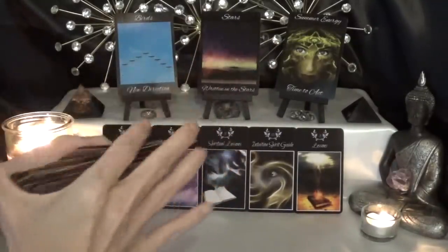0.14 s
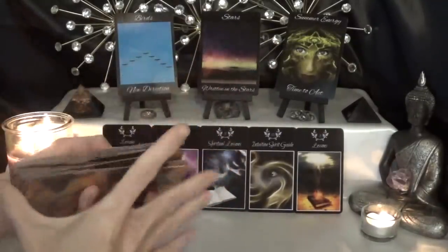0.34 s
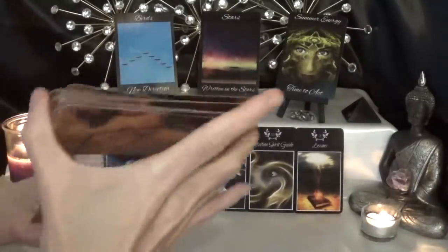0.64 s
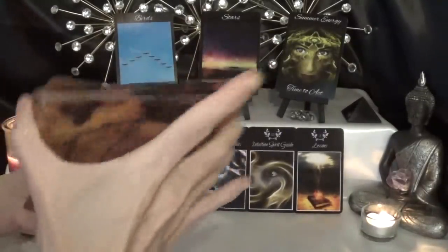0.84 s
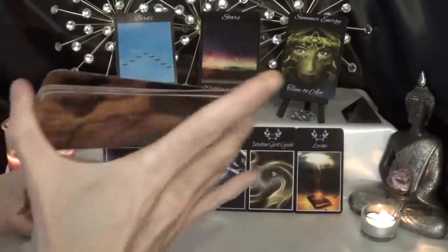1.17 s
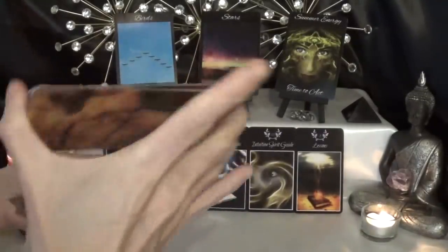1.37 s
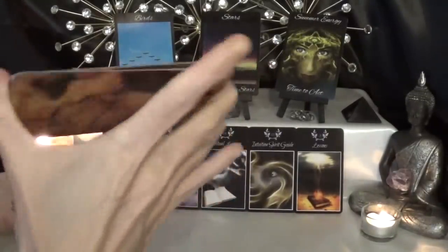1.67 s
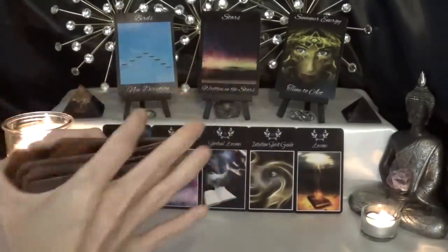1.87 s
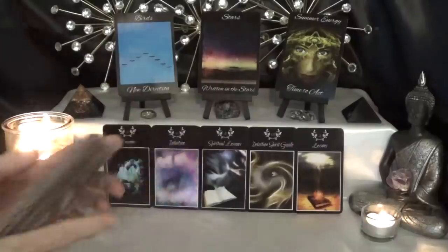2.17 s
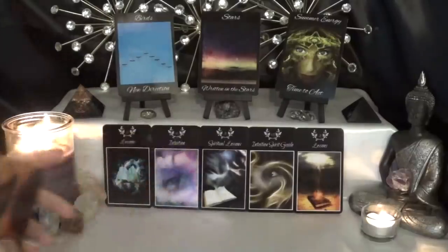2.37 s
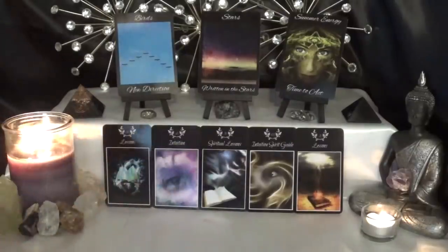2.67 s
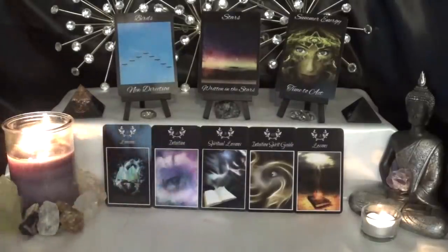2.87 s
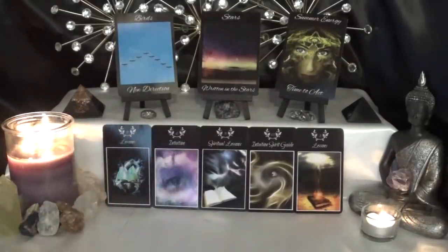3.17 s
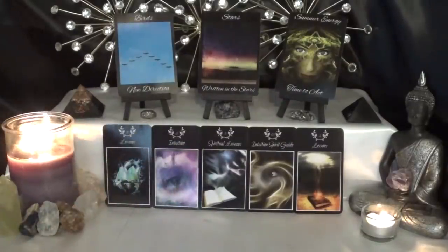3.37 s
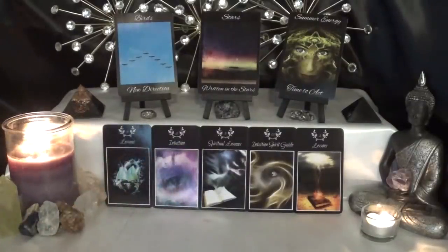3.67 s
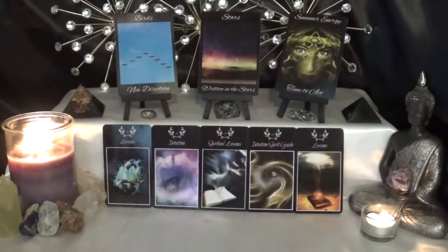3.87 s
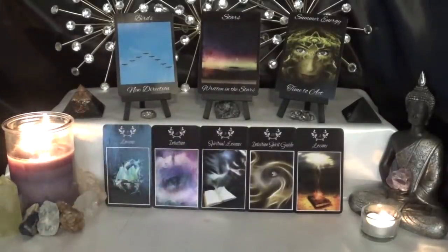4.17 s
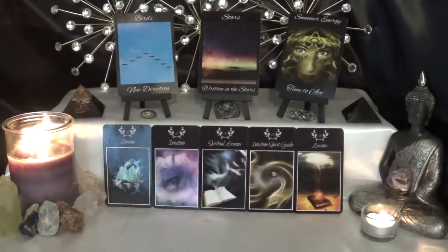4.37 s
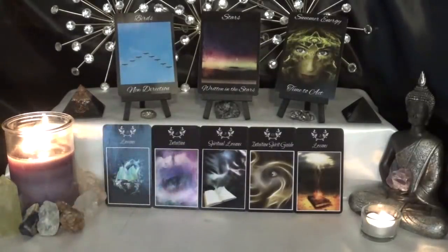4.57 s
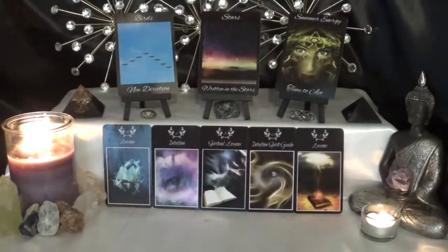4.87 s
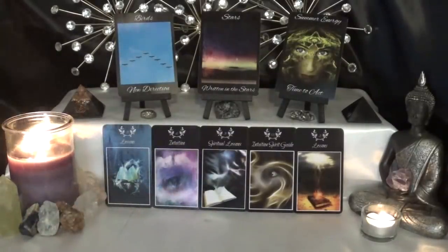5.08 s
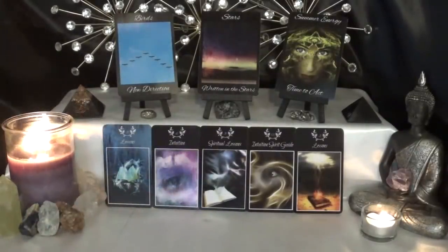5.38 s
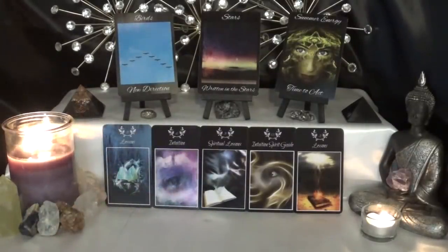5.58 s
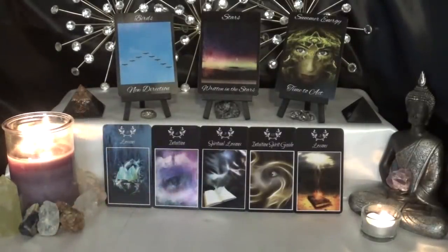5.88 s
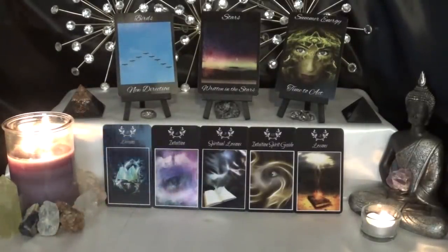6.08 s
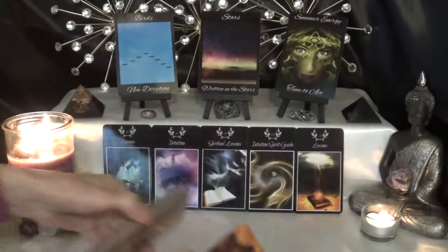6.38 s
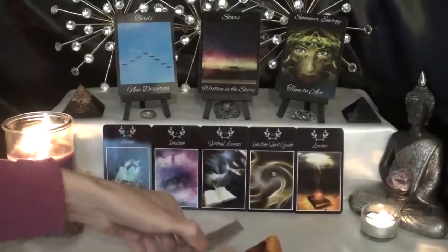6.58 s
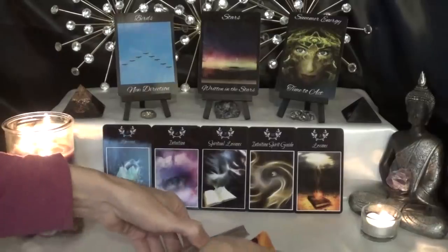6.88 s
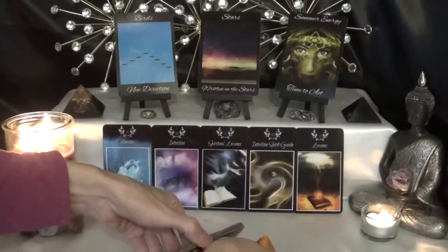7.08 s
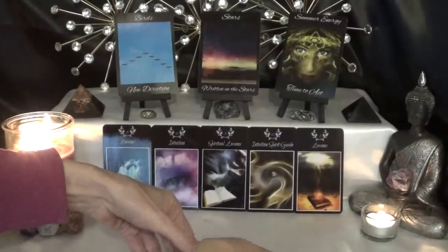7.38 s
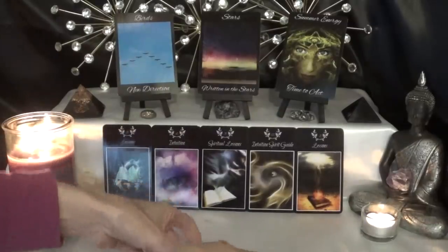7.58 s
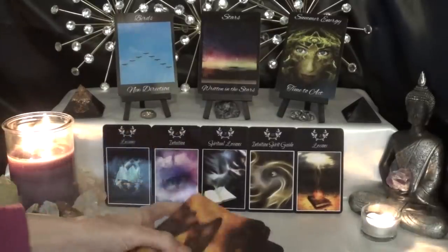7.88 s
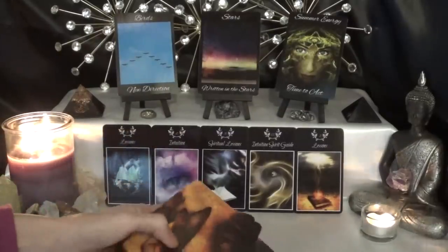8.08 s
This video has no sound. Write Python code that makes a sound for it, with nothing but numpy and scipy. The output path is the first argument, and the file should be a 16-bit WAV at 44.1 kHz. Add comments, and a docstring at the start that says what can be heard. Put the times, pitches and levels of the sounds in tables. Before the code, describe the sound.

A deck of cards is handled close to a stereo microphone pair in a small furnished room with a short, soft tail. From 0 to 2 s, six overhand strokes land at uneven intervals of roughly a quarter second or more, each a crisp crack with trailing ticks, a papery slide and a stop. Around 2.1-2.5 s the deck is squared with patchy rustling and a tap. At 2.9 s it thuds dully on the table. Until 5 s there are only faint brushes, tiny ticks and a very weak knock near 4 s. From 5.1 to 5.65 s come harder, woody raps, strongest at the start and end. Small taps follow from 6.2 s; at 6.9-7.5 s about ten cards snap and slap down rapidly. A tiny squeak, rustle and light clicks finish by 8.2 s. Quiet air and low hum continue throughout, with a faint pulsing high whine until 3.25 s and again from 6.2 s.

```python
"""A small furnished room, a cloth-covered table: a deck of cards is shuffled overhand close to a microphone pair.
Packets slide as patchy friction noise, and card edges snap as cracks with fast rebounds.
The deck is knocked on the table, heard as a swept thud over ringing modes; cards are then thumbed off,
flicked down and picked up. Behind them lie noise-like room air, a quiet hum of sines and a faint pulsing whine."""
import sys
import numpy as np
from scipy import signal
from scipy.fft import rfft, irfft, next_fast_len
from scipy.io import wavfile
from scipy.ndimage import uniform_filter1d, map_coordinates

SR = 44100
rng = np.random.default_rng(int(sys.argv[2]) if len(sys.argv) > 2 else 0)


def file_out(sig):
    """Save sig as 16-bit WAV at sys.argv[1]."""
    # one column per channel
    cols = np.atleast_2d(sig).T
    # limit, then scale
    lim = np.clip(cols, -1, 1)
    pcm = np.round(lim * 32767).astype(np.int16)
    wavfile.write(sys.argv[1], SR, pcm)


N = 363384
TOP_HZ = 11250  # band limit of the microphone pair
TIME = np.arange(N) / SR
HIT_SIZE = 16384  # samples in one hit or room tail
HIT_TIME = np.arange(HIT_SIZE) / SR
HIT_HZ = np.fft.rfftfreq(HIT_SIZE, 1 / SR)


def amp(db):
    """Decibels to gain."""
    return 10 ** (np.asarray(db) / 20)


def unit(x):
    """Scale to rms 1."""
    return x / np.sqrt(np.mean(x ** 2) + 1e-20)


def along(points, hz):
    """Read (frequency [Hz], value) points on a log frequency axis."""
    f, v = np.transpose(points)
    return np.interp(np.log(hz + 1), np.log(f + 1), v)


def fade(t, t60):
    """Exponential decay, 60 dB down after t60 seconds."""
    return np.exp(-np.log(1000) * t / t60)


def below(hz, corner_hz, order):
    """A smooth step from 1 under the corner to 0 above it."""
    return 1 / (1 + (hz / corner_hz) ** order)


def wobble(rate):
    """A smooth random curve, rate knots a second."""
    knots = rng.standard_normal(int(N * rate / SR) + 4)
    return map_coordinates(knots, [TIME * rate])


def filtered(x, response):
    """Multiply the spectrum of x by a response of frequency."""
    m = next_fast_len(N + SR // 2)
    return irfft(rfft(x, m) * response(np.fft.rfftfreq(m, 1 / SR)), m)[..., :N]


def struck(x, gain):
    """Colour one hit with minimum phase, so that nothing sounds before the contact."""
    # folding the cepstrum forward in time makes the filter causal
    cepstrum = irfft(np.log(np.maximum(gain, 1e-6)))
    cepstrum[1:HIT_SIZE // 2] *= 2
    cepstrum[HIT_SIZE // 2 + 1:] = 0
    coloured = irfft(rfft(x) * np.exp(rfft(cepstrum)))
    return coloured * below(HIT_TIME, .28, order=40)


def dying_noise(decay):
    """Two unrelated noises in which each frequency dies at its own speed."""
    hz, t, z = signal.stft(rng.standard_normal((2, HIT_SIZE)), SR, nperseg=256)
    dying = z * fade(t, along(decay, hz)[:, None])
    return signal.istft(dying, SR, nperseg=256)[1][:, :HIT_SIZE]


def spread(pair, side_db):
    """Left and right from a middle signal and a weaker side signal."""
    side = amp(side_db) * pair[1]
    return np.array([pair[0] + side, pair[0] - side])


def add(track, s, sound):
    """Mix a sound into the track at time s [s]."""
    part = track[:, max(round(s * SR), 0):][:, :sound.shape[-1]]
    part += sound[..., :part.shape[-1]]


# colour of the room air: (frequency [Hz], relative level [dB])
AIR_COLOUR = [(13, -51.5), (22, -5.5), (55, -14), (92, -7.5), (119, -11), (159, -13.5), (201, -25.5),
              (223, -10), (241, -14.5), (281, -20), (525, -22), (1210, -26.5), (1340, -27.5), (2190, -29),
              (11000, -37), (14300, -64), (22000, -120)]
# likeness of left and right in the air reaching the pair: (frequency [Hz], correlation [0-1])
AIR_LIKENESS = [(100, 0.54), (250, 0.8), (600, 0.077), (3000, 0.2), (10000, 0.37)]
# steady appliance hum: (frequency [Hz], level [dB rms])
HUM_TONES = [(91.5, -70), (120, -70.5), (149, -71.5), (240, -61.5)]
# when the thin whine sounds: (start [s], end [s])
WHINE_SPANS = [(0, 3.25), (6.217, 8.24)]


def background():
    """Room air as filtered noise, a slightly unsteady hum of sines, and a thin whine that pulses."""
    def mid_and_side(hz):
        turn = np.arccos(np.clip(along(AIR_LIKENESS, hz), -1, 1)) / 2
        return amp(along(AIR_COLOUR, hz)) * [np.cos(turn), np.sin(turn)]

    mid, side = filtered(rng.standard_normal((2, N)), mid_and_side)
    air = amp(-57.5) * unit(np.array([mid + side, mid - side]))
    hum = np.zeros(N)
    for hz, db in HUM_TONES:
        level = amp(db + 0.55 * wobble(9.7))
        hum += level * unit(np.sin(2 * np.pi * hz * TIME + 0.2 * wobble(22.0)))
    pulses = np.maximum(np.sin(2 * np.pi * 29 * TIME + .5 * wobble(7.1)), 0) ** 2
    tone = np.sin(2 * np.pi * 4000 * TIME + 2.1 * wobble(60))
    sounding = sum((TIME > start) & (TIME < end) for start, end in WHINE_SPANS)
    whine = amp(-72) * sounding * unit(pulses * tone)
    return air + hum + whine


# how fast the room's tail dies: (frequency [Hz], time to fall 60 dB [s])
ROOM_T60 = [(150, 0.42), (1000, 0.4), (4000, 0.2), (10000, 0.23)]


def room(x):
    """A small furnished room answers every third of a second of sound with a noise tail of its own."""
    out = np.zeros((2, N))
    for start in range(0, N, SR // 3):
        tail = spread(dying_noise(ROOM_T60), side_db=-5.5) * (1 - fade(HIT_TIME, 0.0033))
        tail /= np.linalg.norm(tail[0])
        answer = signal.fftconvolve(x[None, start:start + SR // 3], tail, axes=1)
        add(out, start / SR, answer)
    return out


# the deck meeting the table, corner first and then the whole edge: (corner time [s], corner level [dB],
# rocking time [s], edge level [dB], hardness [Hz], bass weight [dB], damping by the hand [dB/s])
DECK_KNOCKS = [(2.874, -29, .023, -26, 1050, 10, 340), (2.907, -20, 0.011, -26.5, 560, 10.5, 337),
               (4.01, -58, 0.012, -51, 1400, 7, 198), (5.112, -14.5, 0.022, -15.5, 3700, -6.5, 35),
               (5.19, -29, 0.091, -44.5, 2720, 1.5, 68), (5.336, -27.5, 0.024, -34, 3100, -11, 255),
               (5.411, -26.5, 0.041, -53, 2540, 0, 248), (5.611, -16.5, 0.027, -16.5, 3240, 6, 214)]
CORNER_HARDER, CORNER_WEIGHT_DB = 1.01, -6.5  # a corner is a harder, lighter contact than the edge
SCUFF_SHARE, SCUFF_DB = .42, -15  # the corner scuffs once more part-way through the rocking


def table_contacts():
    """The deck lands on a corner, scuffs, then rocks down onto its edge."""
    for s, corner_db, rock, edge_db, hardness_hz, weight_db, damping in DECK_KNOCKS:
        corner = hardness_hz * CORNER_HARDER, weight_db + CORNER_WEIGHT_DB, damping
        yield s, corner_db, *corner
        yield s + SCUFF_SHARE * rock, corner_db + SCUFF_DB, *corner
        yield s + rock, edge_db, hardness_hz, weight_db, damping


# resonances of the table top: (frequency [Hz], relative level [dB])
TABLE_TOP_MODES = [(114, 4.5), (244, -5), (363, -4), (523, -3.5), (568, -5.5), (630, -5.5), (731, -1),
                   (797, -6.5), (916, -9.5), (988, -14), (1165, -2.5), (1230, -14.5), (1314, -15.5),
                   (1428, -14), (1537, -1.5), (1690, -14.5), (1937, -1.5), (2140, -16), (2426, -16),
                   (2623, -8), (2777, -9), (2950, -9.5), (3620, -25), (3850, -16)]
# ringing of the table top before the hand damps it: (frequency [Hz], time to fall 60 dB [s])
TABLE_T60 = [(100, 0.15), (500, 0.34), (1500, 0.15), (5000, 0.18)]
# colour of the table's thud: (frequency [Hz], relative level [dB])
THUD_COLOUR = [(50, -21.5), (110, -11.5), (175, -5.5), (300, -1), (700, -0.5), (1200, 4.5), (1750, 2.5),
               (2100, -3), (2700, 5.5), (3300, -6.5), (3800, -6), (5000, -12), (11000, -8.5)]


def knocks():
    """The deck sends a bending wave through the table top, which then rings; a soft contact loses the treble."""
    out = np.zeros((2, N))
    hz, mode_db = np.transpose(TABLE_TOP_MODES)[:, :, None]
    build_up = 1 - np.exp(-HIT_TIME * hz / 3.4)
    ring = amp(mode_db) * fade(HIT_TIME, along(TABLE_T60, hz)) * build_up
    # bending waves travel faster at high pitch, so the first arrival is a quick downward sweep
    sweep = irfft(np.exp(-1j * 1.5 * np.sqrt(HIT_HZ)))
    for s, db, hardness_hz, weight_db, damping in table_contacts():
        chance = rng.standard_normal((2, len(hz), 1))  # level and phase of each mode
        tones = np.sin(2 * np.pi * hz * HIT_TIME + np.pi * chance[1])
        modes = np.sum(ring * amp(2 * chance[0]) * tones, axis=0)
        clatter = spread(dying_noise(TABLE_T60), side_db=-8.5)
        clatter = clatter * (1 + 2 * fade(HIT_TIME, 0.043)) * (1 - fade(HIT_TIME, 0.022))
        thud = struck(clatter + amp(15.5) * sweep, amp(along(THUD_COLOUR, HIT_HZ)))
        bass_weight = amp(weight_db * below(HIT_HZ, 600, order=2))
        contact = below(HIT_HZ, hardness_hz, order=4) * bass_weight
        hit = struck(amp(7.0) * thud + amp(-6.5) * modes, contact)
        add(out, s, amp(db - damping * HIT_TIME) * hit)
    return out


# brief squeaks and scrapes of fingers on the cards: (peak time [s], length [s], frequency [Hz], level [dB])
FINGER_SQUEAKS = [(3.831, 0.032, 1780, -51.5), (7.646, 0.028, 1970, -47), (7.651, 0.028, 1030, -50)]


def squeaks():
    """A fingertip sticks and slips for a moment: narrow-band noise around one resonance of the card."""
    out = np.zeros((2, N))
    for s, length, centre_hz, db in FINGER_SQUEAKS:
        resonance = below(np.abs(HIT_HZ - centre_hz), 110, order=2)
        tone = irfft(rfft(rng.standard_normal(HIT_SIZE)) * resonance)
        swell = np.exp(-(2 * (HIT_TIME / length - 2)) ** 2)
        add(out, s - 2 * length, amp(db) * unit(tone) * swell)
    return out


SLIDE_ATTACK_S, SLIDE_RELEASE_S = 0.033, 0.054  # times to rise and to fall by 60 dB


def glide(start, end, start_db, end_db):
    """(time [s], level [dB]) points of one slide: attack, steady swell or fade, release."""
    return [(start - SLIDE_ATTACK_S, start_db - 60), (start, start_db),
            (end, end_db), (end + SLIDE_RELEASE_S, end_db - 60)]


# overhand strokes, also snapped by shuffle_contacts: a packet lands, a few cards trail after it,
# it slides down the deck and stops
# (landing time [s], landing level [dB], edge treble [dB], gap between trailing cards [s],
#  first trailing level [dB], slide length [s], slide start level [dB], slide end level [dB],
#  pressure [dB], stop level [dB])
OVERHAND_STROKES = [(0.0687, -5, 11.5, 0.027, -17.5, 0.13, -42, -46, 2, -26),
                    (0.7865, 3.5, -5, .0198, 2.5, 0.068, -41.5, -30, 2.5, -3),
                    (1.0558, -7, 1, 0.026, -5, 0.1, -43.5, -37.5, 8.5, -15),
                    (1.2978, -9, 4.5, .005, -4.5, 0.091, -45.5, -33, -2, -3),
                    (1.5592, 3, -9, .0093, -3, .0545, -53, -34.5, 9, -5),
                    (1.8166, -1, 4.5, 0.0038, -18, 0.1, -30, -39.5, -2.5, -22)]
# short brushes of one card across another: (peak time [s], length [s], peak level [dB], pressure [dB])
CARD_BRUSHES = [(0.096, 0.0054, -37.5, -9), (0.358, .03, -41, -22), (2.209, 0.03, -39.5, -8),
                (0.895, 0.0085, -25, -7), (1.053, 0.026, -40, 7), (1.354, 0.012, -35, -7),
                (2.912, 0.054, -51.5, -10), (3.528, 0.017, -55, 7.5), (3.75, 0.093, -59, 8.5),
                (3.889, 0.076, -63, 15), (4.02, .06, -62.5, 11.5), (4.235, 0.096, -61, 9.5),
                (6.519, .04, -50, -7), (6.86, 0.033, -50, 5), (7.51, 0.063, -36, 10),
                (7.711, 0.048, -45.5, 6), (8.089, 0.038, -45, 5), (8.239, 0.067, -38.5, -26)]
BRUSH_SWELL_DB = 6.5  # growth over a brush
# rubbing while the deck is cut, eased, squared up, held, dealt from and picked up: (time [s], level [dB])
CUTTING_RUB = [(0.2, -57), (0.254, -53.5), (0.29, -42), (0.306, -53), (0.356, -45), (0.4, -55),
               (0.412, -44), (0.478, -63), (0.588, -50.5), (0.646, -35.5), (0.678, -79), (0.7, -67)]
EASING_RUB = [(1.93, -44.5), (1.998, -45), (2.1, -47)]
SQUARING_RUB = [(2.14, -44.5), (2.176, -47), (2.208, -38), (2.23, -49.5), (2.272, -39), (2.282, -48),
                (2.316, -42.5), (2.326, -49.5), (2.406, -42), (2.48, -74)]
HOLDING_RUB = [(2.5, -60.5), (2.838, -63.5), (2.888, -62.5), (3.14, -72.5), (3.27, -60.5)]
DEALING_RUB = [(6.94, -48), (7.024, -74), (7.088, -57), (7.164, -58), (7.354, -48.5), (7.56, -51)]
LIFTING_RUB = [(7.58, -49), (7.672, -58), (7.802, -57), (7.932, -58), (8.2, -58.5)]


def hand_motion():
    """Sliding speed and pressure: the strokes, the brushes and the longer rubbing between them."""
    moves = []
    for s, _, _, _, _, length, first_db, last_db, pressure_db, _ in OVERHAND_STROKES:
        moves.append((glide(s, s + length, first_db, last_db), pressure_db))
    for s, length, db, pressure_db in CARD_BRUSHES:
        moves.append((glide(s - length, s, db - BRUSH_SWELL_DB, db), pressure_db))
    # (level curve, pressure [dB])
    moves += [(CUTTING_RUB, -2), (np.vstack([EASING_RUB, SQUARING_RUB]), -6),
              (HOLDING_RUB, 3), (DEALING_RUB, 11), (LIFTING_RUB, 8)]
    speed, press = np.zeros(N), np.zeros(N)
    for points, pressure_db in moves:
        s, db = np.transpose(points)
        span = slice(max(int(s[0] * SR), 0), int(s[-1] * SR))
        level = amp(np.interp(TIME[span], s, db))
        speed[span] += level
        press[span] += level * amp(pressure_db)
    return np.abs(uniform_filter1d(np.array([speed, press]), int(0.006 * SR)))


def rubbing(spectrum, catches, patchy_db):
    """Friction noise of rms 1, with resonances that shift as the overlap of the cards changes."""
    noise = spread(rng.standard_normal((2, N)), side_db=-13)
    z = signal.stft(noise * catches, nperseg=512)[2]
    # smooth random patches over frequency and time
    patches = uniform_filter1d(rng.standard_normal(z.shape[1:]), size=7, axis=0)
    patches = uniform_filter1d(patches, size=9, axis=1)
    pair = signal.istft(z * amp(patchy_db * unit(patches)), nperseg=512)[1][:, :N]
    return unit(filtered(pair, lambda hz: amp(along(spectrum, hz))))


# colour of card faces rubbing: (frequency [Hz], relative level [dB])
RUSTLE_COLOUR = [(240, -29.5), (400, -22), (550, -5), (985, -18.5), (1070, -15.5), (1580, -5.5), (1690, -7),
                 (2300, -3.5), (3630, -1), (5270, 1.5), (8810, 1), (10600, -0.5), (11000, -19),
                 (14300, -44), (22000, -120)]


def slides():
    """Card faces rub in tiny catches; pressing harder brings out the lower voice of the packet."""
    speed, press = hand_motion()
    catches = unit(amp(2.6 * wobble(64) + 1.9 * wobble(900)))
    # (frequency [Hz], relative level [dB])
    packet = [(30, -15.5), (100, -1.5), (350, 0.5), (700, -1.5),
              (1500, -0.5), (3000, 1), (6000, -14), (11000, -40)]
    hiss = speed * rubbing(RUSTLE_COLOUR, catches, patchy_db=0.5)
    # under pressure single card edges tick past one another, about 260 a second
    ticks = (rng.random(N) < 260 / SR) * rng.standard_normal(N)
    ticks = unit(filtered(ticks, lambda hz: amp(along(SNAP_COLOUR, hz))))
    crackle = amp(-14) * np.sqrt(speed * press) * ticks
    low_voice = amp(-9.0) * press * rubbing(packet, catches, patchy_db=3.0)
    return hiss + crackle + low_voice


def unit_level(gain):
    """The rms of a hit's colour over the band the microphones keep."""
    return np.sqrt(np.mean(gain[HIT_HZ < TOP_HZ] ** 2))


# colour of a card edge, both snapping and ticking: (frequency [Hz], relative level [dB])
SNAP_COLOUR = [(30, -42.5), (110, -4.5), (300, -5), (700, 0), (1400, 6.5), (2200, 5.5), (3200, 8),
               (5000, 3), (8000, 0), (11000, -5)]


def snaps(rows, flutter_db, flutter_t60, ripple_db):
    """Each edge (time [s], level, body, edge [dB]) cracks and rebounds over a short flutter of its neighbours."""
    out = np.zeros((2, N))
    for s, db, body, edge in rows:
        crack = np.zeros((2, HIT_SIZE))
        rebounds = np.cumsum(rng.uniform(.0003, .0009, 4))
        crack[:, (np.r_[0, rebounds] * SR).astype(int)] = [.88, -.45, .28, -.17, .1]
        flutter = spread(rng.standard_normal((2, HIT_SIZE)), side_db=-10.5) * fade(HIT_TIME, flutter_t60)
        flutter *= amp(flutter_db) / np.linalg.norm(flutter[0])
        # the free length of the card, and so its resonances, differ from snap to snap
        octaves = np.log2(1 + HIT_HZ / 500)
        ripple = map_coordinates(rng.standard_normal(40), [6 * octaves], mode="nearest")
        low = body * below(HIT_HZ, 1300, order=4)
        high = edge * (1 - below(HIT_HZ, 3900, order=4))
        gain = amp(along(SNAP_COLOUR, HIT_HZ) + low + high + ripple_db * ripple)
        add(out, s, amp(db) * struck(crack + flutter, gain / unit_level(gain)))
    return out


def trailing(s, gap, db, loss_db, body_db, edge_db, count):
    """Contacts that follow a snap at nearly even gaps, each weaker than the last."""
    slip = np.r_[0, rng.uniform(-.2, .2, count - 1)]
    return [(s + gap * (k + 1 + slip[k]), db - loss_db * k, body_db, edge_db) for k in range(count)]


def stray_flicks(start, end, db, body_db, edge_db, count):
    """Rows of faint flicks from the cards that slip past the thumb between the loud ones."""
    times = start + (end - start) * (np.arange(count) + rng.random(count)) / count
    levels = [db, body_db, edge_db] + 2.9 * rng.standard_normal((count, 3))
    return np.column_stack([times, levels])


# cards thumbed onto the pile: each flicks free, springs back, slaps down and settles
# (flick time [s], flick level [dB], body [dB], edge [dB], fall time [s], slap level [dB])
THUMBED_CARDS = [(6.9186, -17, -1, -4, 0.021, -38), (6.949, -8, 8, 8, 0.013, -19.5),
                 (6.9805, 0, 8, 2, .007, 5), (7.047, -12, 0, -0.5, 0.023, -11),
                 (7.1111, 1.5, -1.5, -9, 0.019, -5), (7.1849, 0.5, -4.5, -6.5, 0.0097, -2.5),
                 (7.27, -7, 3.5, 2.5, .0166, -2), (7.3463, -1.5, 9.5, 14.5, 0.028, -8),
                 (7.413, 4.5, 5, 6.5, 0.012, 4.5), (7.469, 6, 11, 12, 0.014, 6)]
SPRING_S, SPRING_DB, SPRING_EDGE_DB = 0.0033, -6, -16  # the spring-back is weaker and duller
SETTLE_LOSS_DB = 10.5  # loss from slap to settling


def deal_contacts():
    """Each dealt card: the flick, its spring-back, the slap and the settling."""
    rows = []
    for s, db, body, edge, fall, slap_db in THUMBED_CARDS:
        rows.append((s, db, body, edge))
        rows.append((s + SPRING_S, db + SPRING_DB, body, edge + SPRING_EDGE_DB))
        rows += trailing(s, fall, slap_db, SETTLE_LOSS_DB, body, edge, count=2)
    return rows


PACKET_BODY_DB = -14  # a packet has little bass
TRAIL_EDGE_DB, TRAIL_LOSS_DB = -4.5, 7.5  # treble of the trailing cards, each weaker than the last
GRAZE_S, GRAZE_DB = .0035, -20  # the foremost card grazes the deck just before its packet lands or stops
SETTLE_S, SETTLE_DB, SETTLE_EDGE_DB = .0025, -5.5, -3.5  # the rest closes up just after, more dully
STOP_BODY_DB, STOP_EDGE_DB = -16.5, -1.5  # colour of the packet's stop against the palm
STOP_DULLING = 0.88  # dB duller per dB of pressure


def shuffle_contacts():
    """Each overhand stroke: the landing, the trailing cards, the stop; a packet never arrives all at once."""
    rows = []
    for s, db, edge, gap, trail_db, length, _, _, pressure, stop_db in OVERHAND_STROKES:
        dull = STOP_DULLING * pressure
        landing = s, db, PACKET_BODY_DB, edge
        stop = s + length, stop_db, STOP_BODY_DB, STOP_EDGE_DB - dull
        for at, level, body, bright in (landing, stop):
            rows.append((at - GRAZE_S, level + GRAZE_DB, body, bright))
            rows.append((at, level, body, bright))
            rows.append((at + SETTLE_S, level + SETTLE_DB, body, bright + SETTLE_EDGE_DB))
        rows += trailing(s, gap, trail_db, TRAIL_LOSS_DB, PACKET_BODY_DB, TRAIL_EDGE_DB, count=3)
    return rows


# single taps of a card's edge while the deck is handled: (time [s], level [dB], body [dB], edge [dB])
EDGE_TAPS = [(0.648, -10, 4, -22), (1.0436, -6.5, -3, -10), (1.1067, -3.5, -10, 21), (2.1192, -3, -8.5, 0),
             (2.3135, -25, 6, 17), (3.2942, -25.5, -8, -3), (3.5075, -19, 10, 7), (4.1565, -21.5, 9, 11),
             (4.1744, -24, -14, 8), (6.2305, -31.5, -17, -6), (6.4929, -21, 11, 20), (6.7785, -23, 23, 8),
             (6.864, -17.5, 25, -22), (7.7486, -21.5, -6, -8), (7.8852, -10, -2.5, -6),
             (7.9709, -8.5, -2, -1.5), (8.0863, -11.5, -1.5, -21)]


def scene():
    """Hands close to the microphone, the table a little to the left, the room around them."""
    shuffle = snaps(shuffle_contacts(), flutter_db=2.5, flutter_t60=0.011, ripple_db=3.5)
    taps = snaps(EDGE_TAPS, flutter_db=0.5, flutter_t60=0.045, ripple_db=5.0)
    strays = stray_flicks(7.055, 7.41, db=-14.5, body_db=16.5, edge_db=11, count=13)
    flicks = np.vstack([deal_contacts(), strays])
    deal = snaps(flicks, flutter_db=1.5, flutter_t60=0.049, ripple_db=3.0)
    # left and right gains [dB]
    cards = (shuffle + slides() + squeaks()) * amp([[.6], [-.6]]) + taps + deal
    table = knocks() * amp([[.9], [-.9]])
    to_room = amp(-12.0) * cards.mean(axis=0) + amp(-17) * table.mean(axis=0)
    return cards + table + room(to_room) + background()


def record(dry):
    """The close microphone pair hears bass nearly as mono and keeps almost nothing above its band limit."""
    side = filtered((dry[0] - dry[1]) / 2, lambda hz: 1 - .85 * below(hz, 250, order=4))
    mid = dry.mean(axis=0)
    return filtered(np.array([mid + side, mid - side]), lambda hz: below(hz, TOP_HZ, order=90))


dry = scene()
out = record(dry)
file_out(out)
```